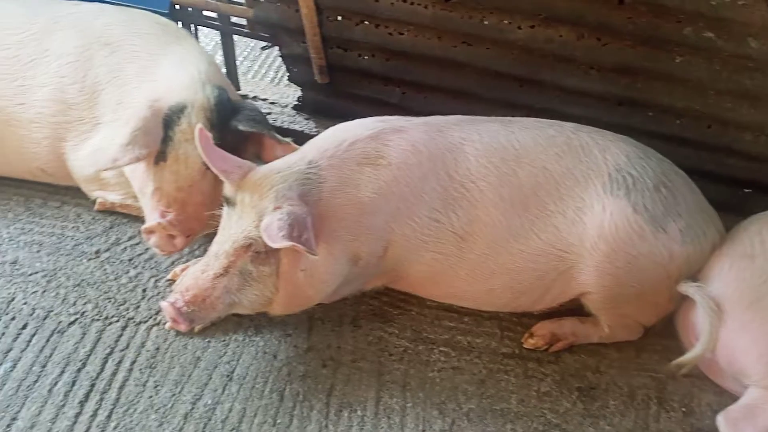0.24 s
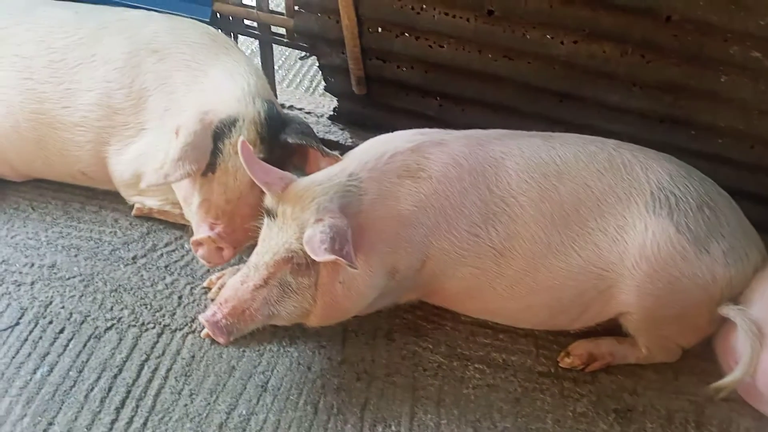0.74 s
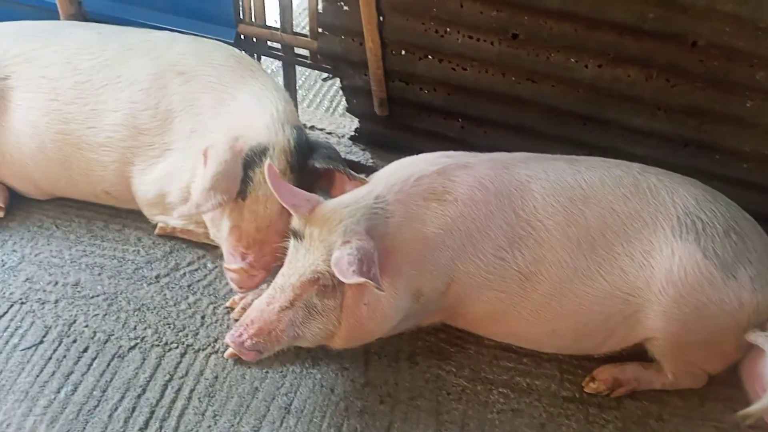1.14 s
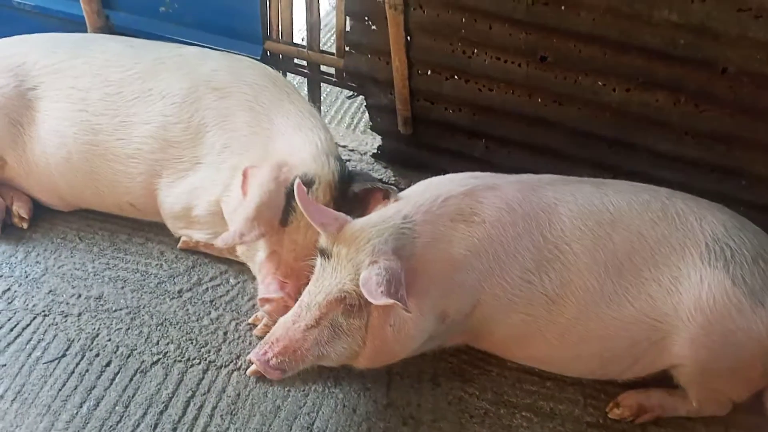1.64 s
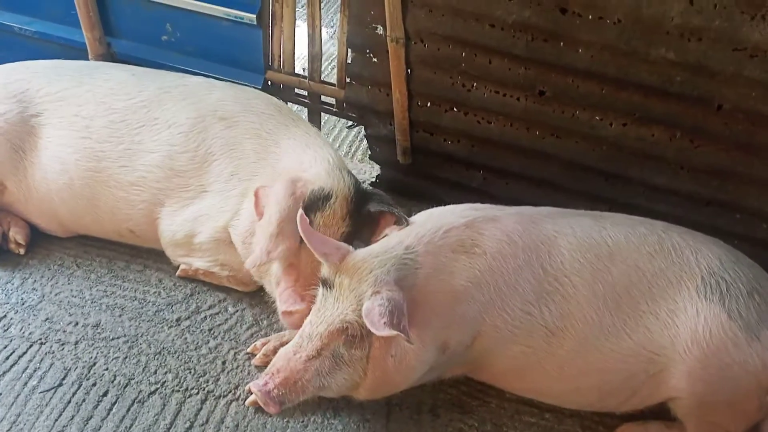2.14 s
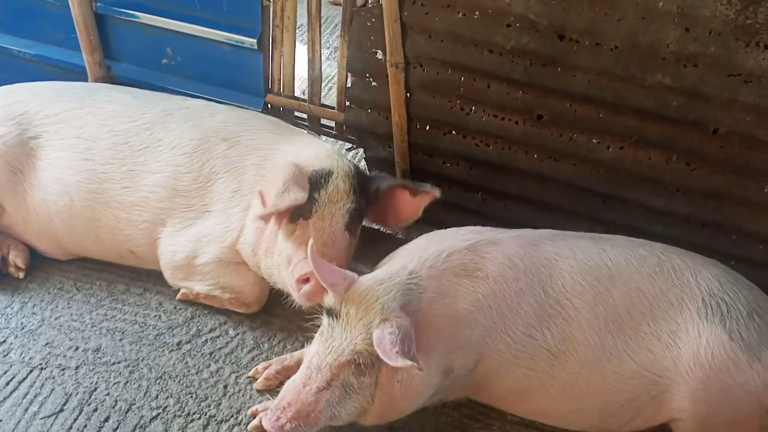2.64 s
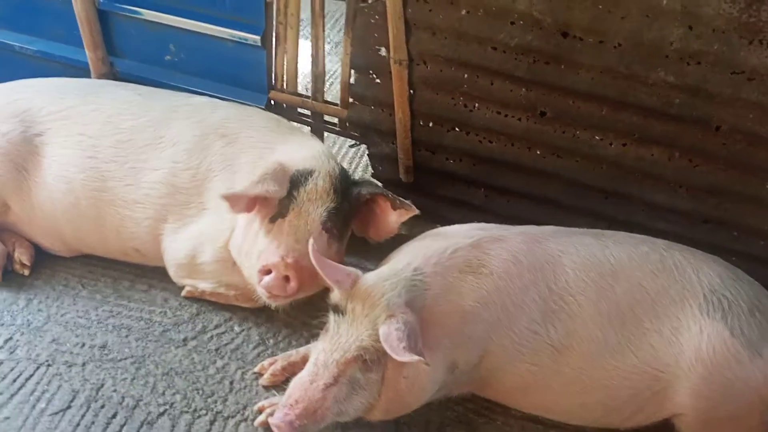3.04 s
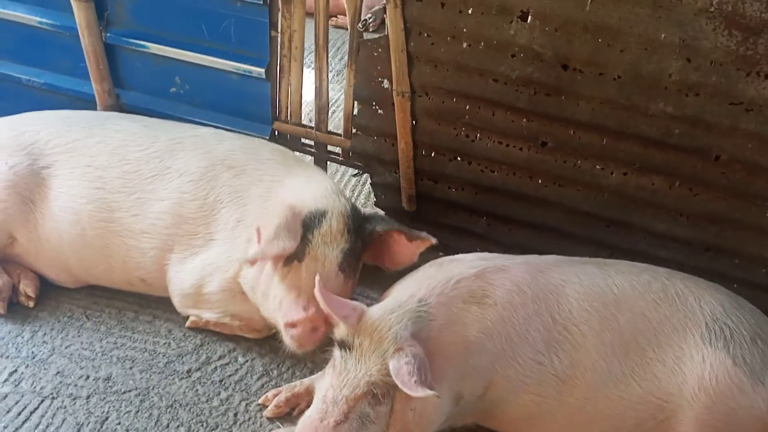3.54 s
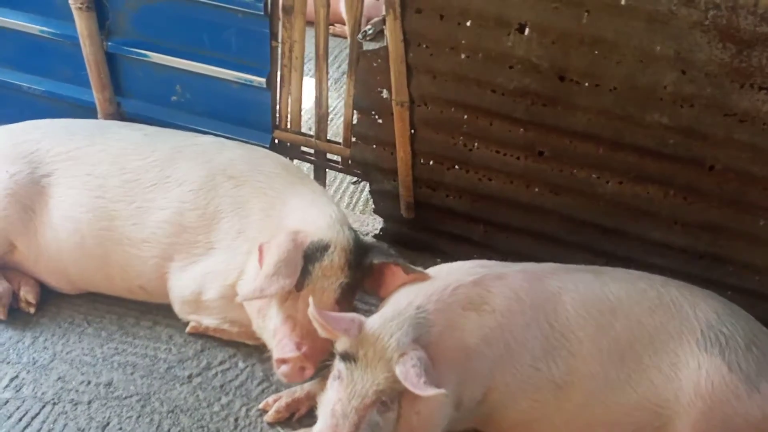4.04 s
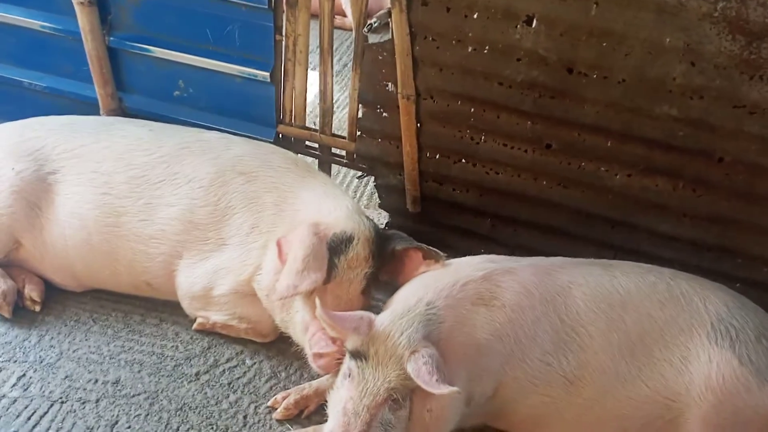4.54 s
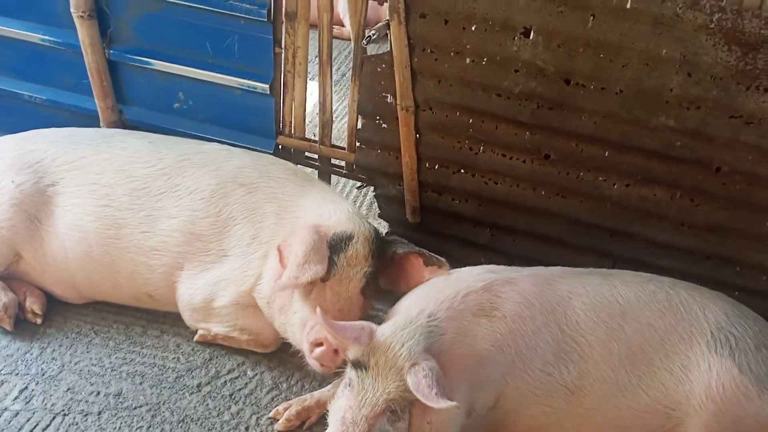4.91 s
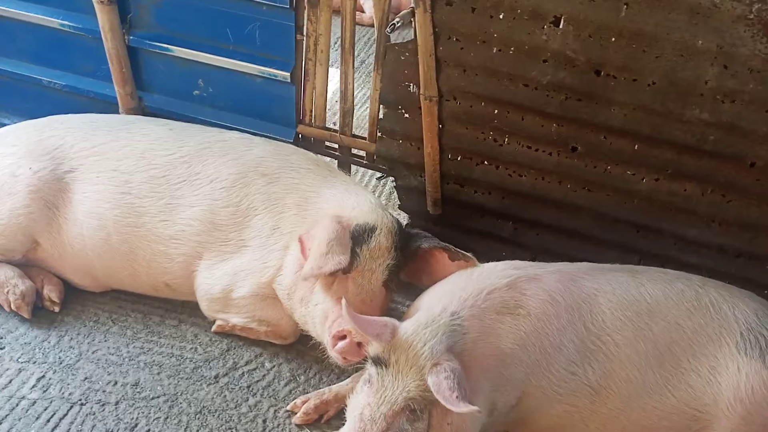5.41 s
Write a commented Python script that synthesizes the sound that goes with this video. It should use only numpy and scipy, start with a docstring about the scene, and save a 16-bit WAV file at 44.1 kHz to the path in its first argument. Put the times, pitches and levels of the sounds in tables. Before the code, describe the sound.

Close pig grunts, raspy breaths and a snort in a farm pen, over faint bird chirps and a low, faraway engine hum.

```python
"""Young pigs lie in a concrete pen with sheet-metal walls; small birds chirp outside over the yard's hiss.
One pig starts a run of hoarse rasps, air forced through a tight throat. Another grunts close by:
slow snaps of the vocal folds, some over a low nasal hum. A nose sighs softly and a snout snorts.
From about halfway a far engine swells, booming in the pen as it slows and picks up again,
and a nearer bird adds sharp falling tweets while the pigs go on."""
import sys
import numpy as np
from scipy import signal
from scipy.fft import rfft, irfft
from scipy.io import wavfile
from scipy.ndimage import uniform_filter1d

SR = 44100
rng = np.random.default_rng(int(sys.argv[2]) if len(sys.argv) > 2 else 0)


def to_wav(sig):
    """Store sig (one row per channel, or 1-D mono) as 16-bit WAV at the path in sys.argv[1].

    Samples outside -1..1 are clipped; the rate is SR.
    """
    pcm = np.clip(np.atleast_2d(sig), -1, 1) * 32767
    pcm = np.round(pcm).astype(np.int16)
    wavfile.write(sys.argv[1], SR, pcm.T)  # frames by channels


N = 250047
TIME = np.arange(N) / SR
HZ = np.fft.rfftfreq(8192, 1 / SR)

# snap trains: start_s, length_s, first_gap_s, gap_growth_s, full_effort_s, rise_s, fall_s,
# level_db, thump_db, click_db, rebound_db, tilt_db_per_octave
GRUNT_EVENTS = [ (.5235, .115, .0318, .001, .034, .034, .13, -2, -3, -36, -3, 2.5),
                (1.064, .015, .03, 0, .002, .036, .06, -7.5, -1.5, -36, -20, -4),
                (2.6465, .088, .0187, .0054, .05, .039, .1, 2, -5, -33, -13, 1),
                (3.5198, .055, .0372, 0, .002, .036, .065, -1, 3.5, -20.5, -20, 2.5),
                (4.5225, .063, .036, -.013, .07, .045, .06, -4, -5, -42, -20, 0),
                (4.852, .135, .021, .005, .035, .024, .05, .5, -5.5, -34, -16, 2)]
# throat resonances, one list per grunt: centre_hz, width_hz, level_db
THROAT_MODES = [
    [(657, 70, -1.5), (1050, 350, -14.5), (1416, 120, -4), (1758, 164, -0.5), (2100, 220, -11.5),
     (3060, 320, -18), (3800, 320, -22.5)],
    [(1480, 120, -2), (1860, 480, -6), (2280, 120, 3), (3430, 350, -19), (4170, 850, -16)],
    [(616, 290, -14), (1478, 160, -3), (1834, 320, -7), (2330, 210, 1), (3020, 400, -18.5),
     (3955, 56, -9.5), (4350, 360, -16), (5700, 200, -36)],
    [(675, 84, 2.5), (1425, 130, 0), (1734, 76, 1.5), (1880, 460, -3), (2930, 480, -11), (3500, 520, -13),
     (3930, 300, -13.5)],
    [(653.6, 190, -13), (1354, 180, -1), (1820, 114, 2.5), (2220, 210, -2), (2570, 190, -7.5),
     (4373, 440, -26)],
    [(740, 120, -6.5), (1375, 94, 5), (1850, 180, 0.5), (2290, 230, 0), (3260, 290, -3.5), (3800, 250, -13),
     (4380, 420, -15), (6000, 320, -26)],
]
# chest resonances: centre_hz, width_hz, level_db
CHEST_MODES = [(188, 73, -3.5), (274, 90, -5.5), (438, 246, -16.5), (90.5, 130, -13)]
def grunts(throat_db=6, chest_db=6, wet_db=4, puff_s=0.018, shake_s=0.022, spread_s=0.003984):
    """Each snap of the folds rings throat and chest, with a puff of air and a wet click."""
    out, t = np.zeros(N), np.arange(len(HZ)) / SR
    octaves = np.log2(np.clip(HZ, 500, 5000) / 2000)
    chest = impulse(resonances(CHEST_MODES, skirt=1.2))
    click_hz_db = [(1000, -24), (4000, 3), (5600, -13), (6800, 10.5), (8400, 7), (10500, -14), (15000, -7)
                   ]
    click = impulse(amp(log_interp(click_hz_db, HZ)))
    for grunt, throat in zip(GRUNT_EVENTS, THROAT_MODES):
        for start_s, db, thump_db, click_db, tilt_db in snaps(*grunt):
            # soft folds peel apart: each band leaves at its own moment
            lag_s = spread_s * np.interp(HZ, np.linspace(0, SR / 2, 50), rng.random(50) ** 2)
            peel = irfft(np.exp(-2j * np.pi * np.cumsum(lag_s) * HZ[1]))[:len(t)]
            puff = rng.standard_normal(len(t)) * np.exp(-t / puff_s)
            modes = [(hz * (1 + 0.023 * rng.standard_normal()), width_hz, mode_db)
                     for hz, width_hz, mode_db in throat]
            voice = impulse(resonances(modes, skirt=0.85) * amp(tilt_db * octaves))
            add(out, start_s, amp(throat_db + db) * through(peel + 0.036 * puff, voice))
            flesh_shake = through(rng.standard_normal(len(t)) * np.exp(-t / shake_s), chest)
            add(out, start_s, amp(chest_db + thump_db) * (0.79 * chest + 0.032 * flesh_shake))
            add(out, start_s, amp(wet_db + click_db) * through(0.33 * peel + 0.055 * puff, click))
    return out


def snaps(start_s, length_s, gap_s, growth_s, full_s, rise_s, fall_s,
          level_db, thump_db, click_db, rebound_db, tilt_db, rebound_s=0.0115, chest_lag_s=0.031):
    """Slack folds snap, then slap once more, with more thump than voice; the chest swells later."""
    t = 0
    while t < length_s:
        effort_db = swell_db(t - full_s, rise_s, fall_s)
        voice_db = level_db + effort_db
        chest_db = thump_db + swell_db(t - full_s - chest_lag_s, rise_s=0.067, fall_s=fall_s)
        wet_db = click_db + 0.35 * effort_db
        yield start_s + t, voice_db, chest_db, wet_db, tilt_db
        yield (start_s + t + rebound_s, voice_db + rebound_db - 6.5,
               chest_db + rebound_db + 7, wet_db + rebound_db, tilt_db)
        t += max(gap_s, rebound_s)
        gap_s += growth_s


# nasal hums: start_s, length_s, mid_pitch_hz, glide_hz_per_s, end_db, crescendo_db_per_s, throat_index
HUM_EVENTS = [(1.04, .105, 178.4, -51, -25, 62, 1), (2.65, 0.079, 173, 17, -28.5, -12, 2),
              (4.514, .045, 248.3, 250, -29, 100, 4), (4.848, 0.12, 182.2, -66, -21, 121, 5)]
def hums(level_db=-1, leak_db=-11, jitter=0.043, attack_s=0.013, release_db_per_s=545):
    """With the mouth shut the folds run smoothly: almost a sine, with air leaking once a cycle."""
    out = np.zeros(N)
    for start_s, length_s, pitch_hz, glide, end_db, crescendo, throat_index in HUM_EVENTS:
        t = np.arange(0, length_s + 40 / release_db_per_s, 1 / SR)
        hz = (pitch_hz + glide * (t - length_s / 2)) * (1 + jitter * wander(len(t), 80))
        phase = 2 * np.pi * np.cumsum(hz) / SR
        slope_db_per_s = np.where(t < length_s, crescendo, -release_db_per_s)
        envelope = np.minimum(t / attack_s, 1) * amp(level_db + end_db + (t - length_s) * slope_db_per_s)
        tone = unit(np.sin(phase) + amp(-22) * np.sin(2 * phase))
        puffs = rng.standard_normal(len(t)) * (1 + np.cos(phase)) ** 2
        leak = unit(through(puffs, impulse(resonances(THROAT_MODES[throat_index]))))
        strain = (pitch_hz / 180) ** 3  # tense, high folds leak more
        add(out, start_s, envelope * (tone + amp(leak_db) * strain * leak))
    return out


# hoarse breaths: first_catch_s, peak_s, rise_s, effort_db, tight_db, whistle_db, upper_hz_ratio, air_db
RASP_EVENTS = [ (.16, 0.179, 0.038, -22, -1.5, 2.5, 1.07, -4.5),
               (1.061, 1.178, 0.097, -16.5, 0.5, 1, .98, -6.5),
               (1.691, 1.734, 0.051, -20, -0.5, 1.5, 0.97, -3.5),
               (2.199, 2.244, 0.075, -28.5, -6, -7, 1.02, 1),
               (2.858, 2.908, 0.069, -23.5, -1, -7.5, 1.063, -2),
               (3.398, 3.429, 0.062, -22.5, -0.5, -3, 1.025, -3),
               (4.304, 4.368, 0.083, -19, 0, -0.5, 0.98, -1.5),
               (5.473, 5.519, 0.05, -21, -2.5, -3.5, 1.01, -4)]
# lower and upper throat resonances: centre_hz, width_hz, level_db
RASP_LOW_MODES = [(95, 50, -14), (285, 140, -10), (570, 140, -11), (805, 110, -9), (1100, 220, -14),
                  (1380, 250, -18)]
RASP_HIGH_MODES = [(1675, 150, -6), (1845, 130, -4), (2075, 110, 1), (2200, 130, -3), (2435, 160, -7),
                   (2835, 200, -9.5), (3320, 320, -14.5), (3750, 150, -21), (4700, 900, -35)]
def rasps(level_db=-1, catch_hz=43, catch_fade_s=0.07, release_s=0.0054, sag=0.27, uncaught_db=-3.5,
          flutter_db=0.68, whistle_hz=1127, whistle_width_hz=60):
    """Soft tissue in a tight throat catches and chops the airflow; the snout adds a hollow whistle."""
    out = np.zeros(N)
    airy_top = np.clip(np.log2(HZ / 2300 + 1e-9) * 3, 0, 1)
    edge_db = 1.5 * airy_top - 2.5 * np.clip((HZ - 3650) / 400, 0, 1)
    for catch_s, peak_s, rise_s, db, tight_db, whistle_db, ratio, air_db in RASP_EVENTS:
        t = np.arange(catch_s - 0.04, peak_s + 0.18, 1 / SR)
        since_s = t - catch_s
        # each release jumps up, then sags; the chopping evens out as the throat opens
        jumps = np.exp(-(since_s % (1 / catch_hz)) / release_s) - sag
        chop_db = np.where(since_s < 0, uncaught_db, 6.5 * np.exp(-since_s / catch_fade_s) * jumps)
        flutter = unit(amp(flutter_db * wander(len(t), 130)))
        flow = amp(level_db + db + swell_db(t - peak_s, rise_s, fall_s=0.068) + chop_db) * flutter
        upper = [(hz * ratio, width_hz, mode_db + tight_db) for hz, width_hz, mode_db in RASP_HIGH_MODES]
        modes = [*RASP_LOW_MODES, *upper, (whistle_hz, whistle_width_hz, whistle_db)]
        throat = resonances(modes, skirt=0.76) * amp(air_db * airy_top + edge_db)
        air = flow * signal.windows.tukey(len(t), 0.1) * rng.standard_normal(len(t))
        add(out, t[0], signal.fftconvolve(air, impulse(throat)))
    return out


# nostril blasts: start_s, level_db
SNORT_EVENTS = [(0.689, -38), (.82, -59), (1.415, -28.5)]
# snort spectrum: freq_hz, level_db
SNORT_SPECTRUM = [(100, -17.5), (250, -0.5), (700, -0.5), (1100, -5.5), (1800, -1), (2600, -6.5),
                  (4000, -13.5), (6200, -23), (8200, -14.5), (10200, -32.5), (15500, -34)]
def snorts(attack_s=0.0033, fade_db_per_s=166, flutter_db=1):
    """Sudden blasts of air from the nostrils."""
    flow = sum(np.clip((TIME - start_s) / attack_s, 0, 1) * amp(db - fade_db_per_s * abs(TIME - start_s))
               for start_s, db in SNORT_EVENTS)
    flow *= unit(amp(flutter_db * wander(N, 300)))
    return through(flow * rng.standard_normal(N), impulse(amp(log_interp(SNORT_SPECTRUM, HZ))))


# soft exhalations: peak_s, level_db
SIGH_EVENTS = [(.73, -52), (3.78, -45)]
# nose resonances: centre_hz, width_hz, level_db
NOSE_MODES = [(600, 600, -12), (1830, 510, -2.5), (3300, 1600, -16)]
def sighs(rise_s=0.31, fall_s=0.24):
    """Slow, soft air through a pig's nose."""
    flow = sum(amp(db + swell_db(TIME - peak_s, rise_s, fall_s)) for peak_s, db in SIGH_EVENTS)
    return through(flow * rng.standard_normal(N), impulse(resonances(NOSE_MODES)))


# falling bird calls: start_s, length_s, top_hz, end_hz, level_db
TWEET_EVENTS = [(3.185, .038, 7650, 4700, -41), (3.696, .04, 7500, 4700, -43),
                (4.363, .04, 7450, 5400, -45), (4.853, .04, 7400, 5800, -45)]
def tweets(level_db=-1, fade_db=22, warble=0.027):
    """A nearer bird: each tweet flicks up, then drops and fades."""
    out = np.zeros(N)
    for start_s, length_s, top_hz, end_hz, db in TWEET_EVENTS:
        progress = np.linspace(0, 1, int(length_s * SR))
        hz = np.interp(progress, [0, 0.12, 0.25, 1], [0.88 * top_hz, top_hz, 0.98 * top_hz, end_hz])
        hz *= 1 + warble * wander(len(hz), 600)
        envelope_db = np.interp(progress, [0, 0.15, 0.35, 1], [-fade_db, 0, 0, -fade_db])
        whistle = np.sin(2 * np.pi * np.cumsum(hz) / SR) * signal.windows.tukey(len(hz), 0.1)
        add(out, start_s, amp(level_db + db + envelope_db) * whistle)
    return out


# small bird calls: start_s, pitch_hz, glide_share, level_db, warble_share
CHIRP_EVENTS = [(0, 4780, 0.085, -55.5, 0.025), (.012, 3400, -0.1, -46.5, 0.057),
                (0.399, 4600, 0.0028, -56.5, 0.0087), (.43, 3380, .09, -49.5, 0.075),
                (0.908, 3270, .16, -47.5, 0.058), (1.07, 4400, 0.121, -50, 0.024),
                (1.355, 3400, .09, -49, 0.045), (1.625, 4580, 0.034, -55, .016),
                (1.9, 4400, .14, -49.5, 0.037), (2.03, 626, 0.14, -48.5, .01),
                (2.295, 4650, 0.19, -52, .02), (2.317, 680, 0.13, -51.5, .01),
                (2.385, 525, -0.011, -52, .01), (2.515, 3470, 0.048, -50.5, 0.045),
                (2.9, 4650, 0.025, -53, 0.018), (3.11, 4500, .05, -55, .017),
                (3.742, 4520, 0.065, -48, .025), (3.96, 4570, 0.097, -50, 0.023),
                (4.174, 4510, 0.085, -57, .02), (4.575, 4060, -.07, -50, 0.0046),
                (4.7, 4490, 0.116, -57.5, 0.022), (5.137, 4470, 0.079, -55.5, .017),
                (5.3, 3500, .1, -55.5, .04)]
def chirps(level_db=-5, length_s=0.09, warble_hz=300):
    """Birds outside: gliding whistles, some made buzzy by a quick warble."""
    out, size = np.zeros(N), int(length_s * SR)
    for start_s, pitch_hz, glide, db, warble in CHIRP_EVENTS:
        hz = pitch_hz * (1 + glide * np.linspace(-0.5, 0.5, size))
        hz *= 1 + warble * wander(size, warble_hz)
        whistle = np.sin(2 * np.pi * np.cumsum(hz) / SR) * signal.windows.tukey(size, 0.6)
        add(out, start_s, amp(level_db + db) * unit(whistle))
    return out


# engine speed: time_s, firing_hz
ENGINE_SPEED = [(2.25, 36), (2.38, 33.0), (2.87, 32.5), (3.24, 29.5), (3.94, 27), (4.39, 26.4),
                (4.93, 29.5), (5.67, 29.5)]
# engine loudness: time_s, level_db
ENGINE_LEVEL = [(0, -54), (1.9, -52.5), (2.5, -49), (2.85, -41.5), (3.35, -42), (3.8, -53.5), (4.28, -42.5),
                (4.65, -48.5), (5.1, -42.5), (5.67, -47)]
# exhaust orders: firing_multiple, level_db
EXHAUST_ORDERS = [(2, -7), (3, 1.5), (4, -2.5), (5, -8), (6, -23), (7, -14)]
# standing waves in the pen: centre_hz, width_hz, level_db
PEN_MODES = [(65, 22, -5.5), (82, 16, -0.5), (124.6, 18.6, 1.5), (148.7, 7.4, 0.5), (190, 36, -2.5)]
def engine(level_db=-2, waver_db=3):
    """Only low exhaust orders carry this far; each wavers on the way and booms at a standing wave."""
    firing_hz = np.interp(TIME, *np.transpose(ENGINE_SPEED))
    phase = 2 * np.pi * np.cumsum(firing_hz * (1 + 0.0063 * wander(N, 11.7))) / SR
    tone = np.zeros(N)
    for order, db in EXHAUST_ORDERS:
        gain = amp(db + waver_db * wander(N, 5.8))
        boom = np.interp(order * firing_hz, HZ, resonances(PEN_MODES))
        tone += gain * boom * np.cos(order * phase + 2 * np.pi * rng.random())
    return amp(level_db + np.interp(TIME, *np.transpose(ENGINE_LEVEL))) * unit(tone)


# base spectrum of the hiss: freq_hz, level_db
YARD_SPECTRUM = [(18, -69), (30, -33.5), (52, 0), (114, -3), (219, -6.5), (249, -5), (518, -6), (709, -8),
                 (1260, -7), (1770, 3), (2620, -7.5), (4540, -16.5), (5740, -21), (8280, -25.5),
                 (15500, -40.5)]
# broad peaks and dips on it: centre_hz, width_hz, gain_db
YARD_BUMPS = [(1880, 900, -4.5), (8400, 2130, 10.5), (6500, 1960, -4.5), (10620, 3000, -7.5)]
def yard(level_db=-45, patch_db=1.4):
    """Outdoor hiss with drifting patches."""
    hz, _, noise = signal.stft(rng.standard_normal(N), SR, nperseg=1024, noverlap=768)
    colour_db = log_interp(YARD_SPECTRUM, hz)
    colour_db += sum(db / (1 + (2 * (hz - centre) / width) ** 2) for centre, width, db in YARD_BUMPS)
    colour_db += log_interp([(40, 2), (80, -9), (130, -9), (220, -11)], hz)
    patches = uniform_filter1d(rng.standard_normal(noise.shape), size=10, axis=0)
    patches = unit(uniform_filter1d(patches, size=16, axis=1))
    gain = amp(colour_db[:, None] + patch_db * patches)
    hiss = signal.istft(noise * gain, nperseg=1024, noverlap=768)[1][:N]
    return amp(level_db) * unit(hiss)


# floor and wall reflections: delay_s, gain
REFLECTIONS = [(.0028, 0.087), (.0056, 0.14), (.0082, 0.21), (0.013, .22), (0.0175, 0.15)]
def near_walls(x):
    """The direct sound and its first reflections."""
    out = x.copy()
    for delay_s, gain in REFLECTIONS:
        add(out, delay_s, gain * x)
    return out


# reverberation time: freq_hz, t60_s
PEN_DECAY = [(150, 0.1), (600, 0.32), (1650, 0.23), (2100, 0.32), (2700, 0.28), (5000, 0.4), (12000, 0.13)]
def pen_reverb(x, build_s=0.013):
    """The diffuse tail of the pen, each band dying at its own speed."""
    hz, t, noise = signal.stft(rng.standard_normal(SR // 2), SR, nperseg=256)
    decay = amp(-60 * t / log_interp(PEN_DECAY, hz)[:, None])
    tail = signal.istft(noise * decay, SR, nperseg=256)[1]
    tail *= np.minimum(np.arange(len(tail)) / SR / build_s, 1)
    return through(x, tail / np.linalg.norm(tail))


def amp(db):
    """Decibels to gain."""
    return 10 ** (np.asarray(db) / 20)


def unit(x):
    """Scales to rms 1."""
    return x / np.sqrt(np.mean(x ** 2) + 1e-20)


def log_interp(points, hz):
    """Interpolates (freq_hz, value) points on a log-frequency axis."""
    freq_hz, value = np.transpose(points)
    return np.interp(np.log(hz + 1), np.log(freq_hz + 1), value)


def add(mix, start_s, sound):
    """Mixes a sound in at start_s."""
    part = mix[max(round(start_s * SR), 0):][:len(sound)]
    part += sound[:len(part)]


def wander(size, cutoff_hz):
    """Smooth random motion of rms 1."""
    hz = np.fft.rfftfreq(size, 1 / SR)
    return unit(irfft(rfft(rng.standard_normal(size)) / (1 + (hz / cutoff_hz) ** 4), size))


def swell_db(t, rise_s, fall_s):
    """A rounded arch of effort: top at t = 0, 12 dB down rise_s before and fall_s after."""
    distance = t / np.where(t < 0, rise_s, fall_s)
    return -12 * (np.sqrt(1 + 3 * distance ** 2) - 1)


def resonances(modes, skirt=0.69):
    """Gain over HZ of a set of resonances, summed in power."""
    return np.sqrt(sum((amp(db) / (1 + (2 * (HZ - centre_hz) / width_hz) ** 2) ** skirt) ** 2
                       for centre_hz, width_hz, db in modes))


def impulse(gain):
    """Minimum-phase impulse response of energy 1 with this spectral shape."""
    log_gain = np.log(np.maximum(gain / gain.max(), 1e-5))
    mirrored = np.concatenate([log_gain, log_gain[-2:0:-1]])
    response = np.fft.ifft(np.exp(np.conj(signal.hilbert(mirrored)))).real[:len(HZ)]
    return response / np.linalg.norm(response)


def through(x, response):
    """Filters a sound by an impulse response."""
    return signal.fftconvolve(x, response)[:len(x)]


def scene():
    """Pigs near and fairly dry, birds far and wet, engine and yard behind."""
    grunting = grunts()
    breath = rasps() + snorts() + sighs()
    chirping, tweeting = chirps(), tweets()
    send = amp(-8.5) * grunting + amp(-7.5) * breath + amp(-0.5) * chirping + amp(-5.5) * tweeting
    reverb = pen_reverb(send)
    pigs = near_walls(grunting) + hums() + breath
    return (pigs + chirping + tweeting + reverb + engine() + yard())[None]


def record(dry, low_hz=50, high_hz=15650):
    """The microphone sheds the deep bass; a steep low-pass limits the treble."""
    thin = signal.sosfilt(signal.butter(4, low_hz, "highpass", fs=SR, output="sos"), dry)
    lowpass = signal.firwin(511, high_hz, window=("kaiser", 9), fs=SR)
    return signal.oaconvolve(thin, lowpass[None], "same")


dry = scene()
out = record(dry)
to_wav(out)
```